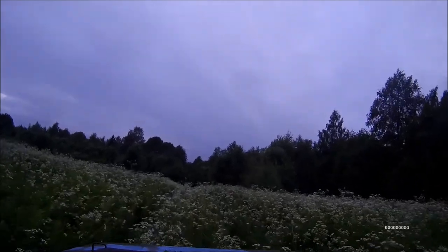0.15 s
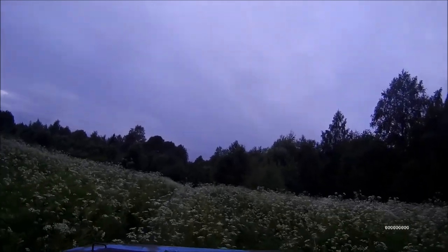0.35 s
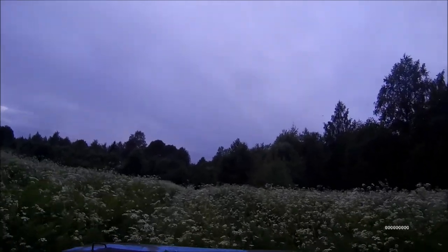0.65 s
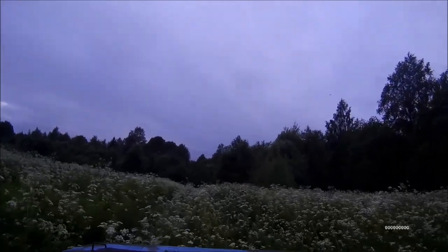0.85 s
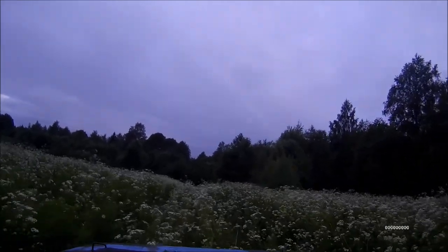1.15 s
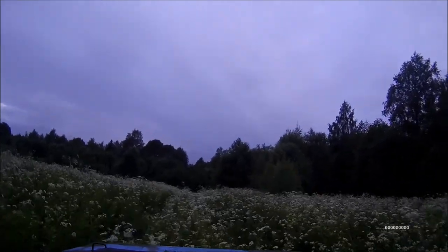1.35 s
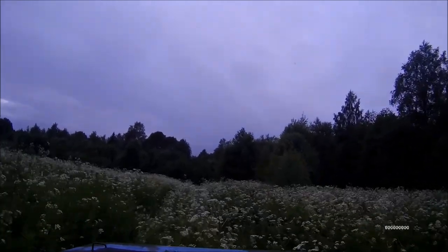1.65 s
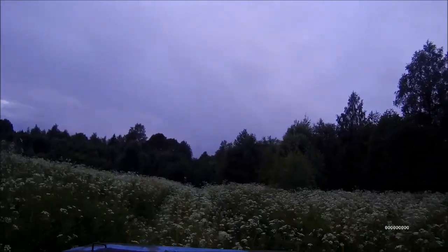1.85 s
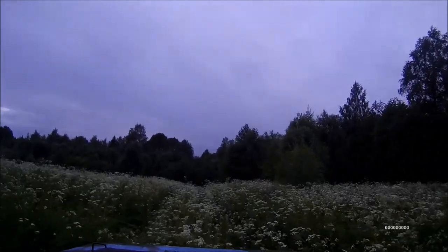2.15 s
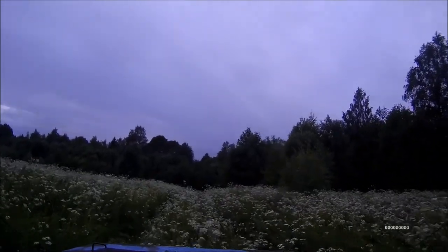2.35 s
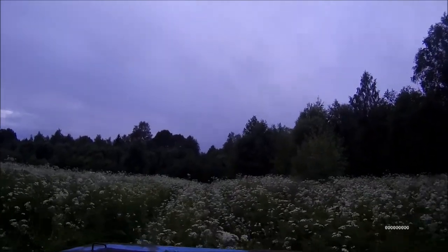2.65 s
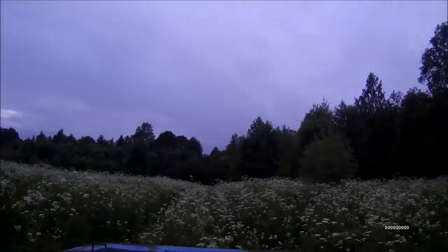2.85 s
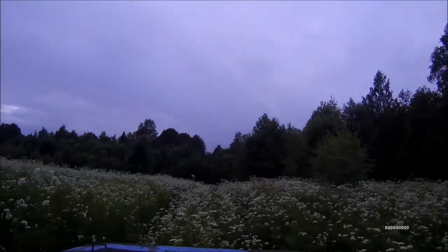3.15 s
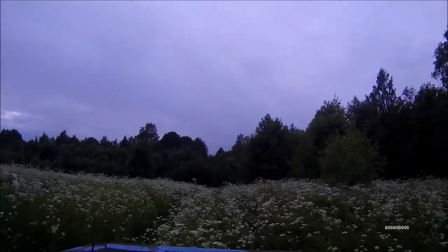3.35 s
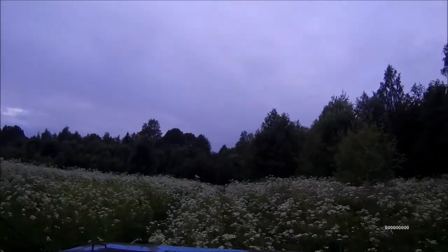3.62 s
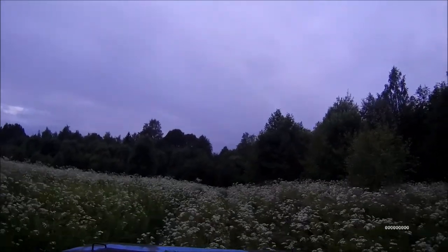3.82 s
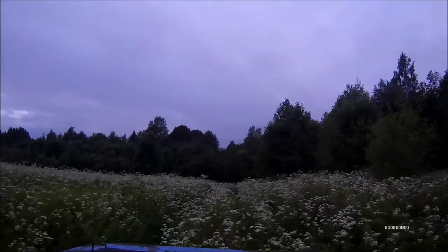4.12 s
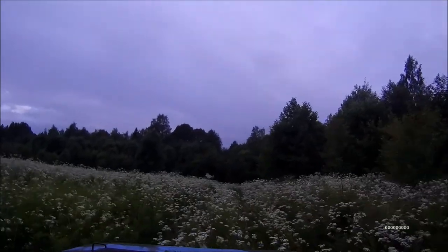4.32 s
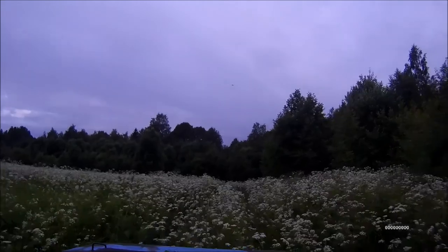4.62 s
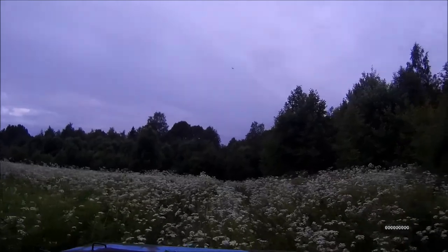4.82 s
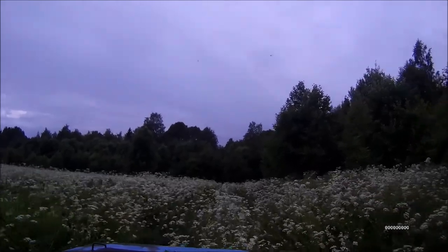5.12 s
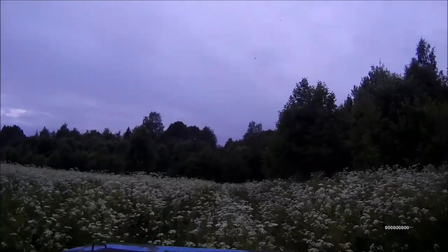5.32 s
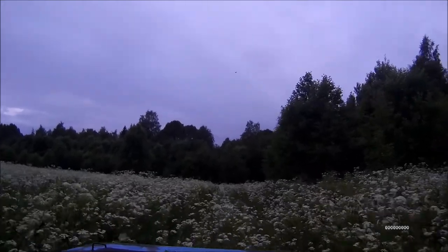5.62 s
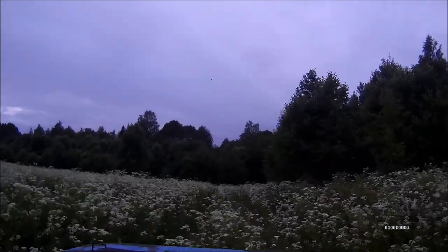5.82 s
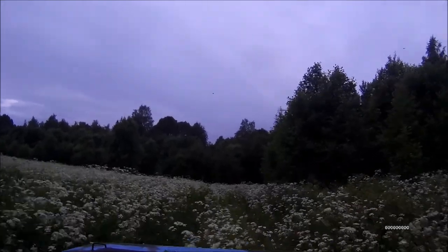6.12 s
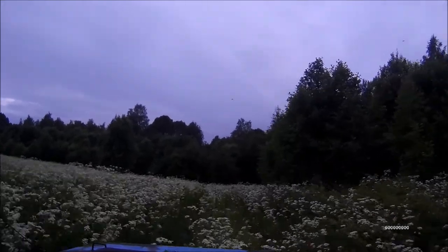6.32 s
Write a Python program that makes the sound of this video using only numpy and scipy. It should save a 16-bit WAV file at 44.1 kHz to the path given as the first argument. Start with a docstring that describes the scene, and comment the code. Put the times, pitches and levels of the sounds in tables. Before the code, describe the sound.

Heard from on board a vehicle crawling through a tall weedy meadow: a deep, booming engine with metallic clatter and a honking intake. Its pitch wavers for three seconds, then climbs and grows fuller. Soft dull thumps come from ruts, low rumble lies beneath, weeds hiss faintly on the panels, and a few stalks snap. Small bright crackles become more frequent toward the end.

```python
"""Off-road vehicle in tall weeds

Heard from on board, an engine booms and clatters while its speed sways and then climbs.
Orders of the firing rate, pulse trains and noise, many ringing resonances, make the engine.
Short pushes into body modes make the thumps of ruts; noise with grains makes weeds brush past.
Struck, splintering stalks snap on the panels; random filtered impulses make bright crackles."""
import sys
import numpy as np
from scipy import signal
from scipy.fft import rfft, irfft, next_fast_len
from scipy.io import wavfile
from scipy.ndimage import uniform_filter1d

SR = 44100
rng = np.random.default_rng(int(sys.argv[2]) if len(sys.argv) > 2 else 0)


def waveform_to_disk(signal):
    """Save audio, clipped to [-1, 1], as 16-bit WAV at the path in sys.argv[1]."""
    frames = np.transpose(np.atleast_2d(signal))
    scaled = np.clip(frames, -1, 1) * 32767
    samples = np.round(scaled).astype(np.int16)
    wavfile.write(sys.argv[1], SR, samples)


N = 285327


def from_db(db):
    """Level definition: amplitude ratio from decibels."""
    return 10 ** (np.asarray(db) / 20)


def rms_one(x):
    """Normalisation to unit effective value."""
    return x / np.sqrt(np.mean(x ** 2) + 1e-20)


def in_time(rows):
    """Linear interpolation: each column of a curve, at every sample."""
    s, *columns = np.transpose(rows)
    return [np.interp(np.arange(N) / SR, s, c) for c in columns]


def drift(rate_hz):
    """Low-passed noise: a slow random course with an rms of 1."""
    step = 40  # samples between computed points
    r = np.exp(-2 * np.pi * rate_hz * step / SR)
    noise = rng.standard_normal(N // step + 2002)
    slow = signal.lfilter([1], [1, -2 * r, r * r], noise)[2000:]  # without the filter's start
    return np.interp(np.arange(N) / step, np.arange(len(slow)), rms_one(slow))


def coloured(x, spectrum):
    """Spectral shaping: a smooth spectrum, 12 dB per octave down above its last point; rms 1."""
    hz, db = np.transpose(spectrum)
    size = next_fast_len(N)
    bins = np.maximum(np.arange(size // 2 + 1) * SR / size, 1)
    gain = from_db(np.interp(np.log(bins), np.log(hz), db))
    gain = gain / np.maximum(bins / hz[-1], 1) ** 2
    return rms_one(irfft(rfft(x, size) * gain, size)[:N])


def resonate(x, hz, width_hz):
    """Damped resonator: a two-pole filter with gain 1 at its top."""
    r = np.exp(-np.pi * width_hz / SR)
    zeros = np.array([1, 0, -1]) * (1 - r * r) / 2
    poles = [1, -2 * r * np.cos(2 * np.pi * hz / SR), r * r]
    return signal.lfilter(zeros, poles, x + 1e-18)


def through(x, modes):
    """Modal superposition: resonances side by side, with alternating signs."""
    return sum((-1) ** k * from_db(db) * resonate(x, hz, width)
               for k, (hz, width, db) in enumerate(modes))


def add(out, s, sound):
    """Superposition: lays a sound into out at time s."""
    at = max(int(s * SR), 0)
    out[at:at + len(sound)] += sound[:max(N - at, 0)]


# engine speed as firing rate: t/s, f/Hz
FIRING_RATE = [(0.0, 48.4), (0.2, 50.5), (0.32, 44.7), (0.45, 51.2), (0.6, 49.1), (0.75, 52.4),
               (0.88, 46.6), (1.02, 50.4), (1.15, 46.3), (1.4, 50.9), (1.55, 47.3), (1.71, 49.3),
               (1.86, 47.3), (2.01, 50.7), (2.16, 47.2), (2.33, 52.4), (2.46, 48.3), (2.56, 50.2),
               (2.68, 48.2), (2.88, 53.7), (3.08, 48.9), (3.56, 54.1), (3.76, 52.0), (3.86, 53.9),
               (4.03, 52.4), (4.26, 57.0), (4.55, 54.9), (4.71, 57.4), (5.07, 58.4), (5.22, 56.9),
               (5.52, 59.4), (5.67, 57.1), (5.82, 58.3), (6.04, 56.5), (6.47, 58.4)]
SLACK_SMOOTH_S = 0.21


def crankshaft():
    """Phase is the integral of frequency: firing rate, firings so far and slowing in Hz per s."""
    rate, = in_time(FIRING_RATE)
    firings = np.cumsum(rate) / SR
    slowing = -uniform_filter1d(np.gradient(rate) * SR, int(SLACK_SMOOTH_S * SR))
    return rate, firings, slowing


# the boom is full at the body resonance, eases off to either side and collapses when the engine lugs
BOOM_HZ, BOOM_HALF_WIDTH_HZ = 57, 5
BOOM_DB, BOOM_DB_PER_HZ = -7.5, 0.55
LUG_HZ, LUG_DB_PER_HZ = 49.5, 4.5
# the second harmonic follows no speed law; the fourth fades once the engine runs fast
DRONE_DB, HUM_DB = -15.5, -24
HUM_FADE_HZ, HUM_FADE_DB_PER_HZ = 53.1, 0.7


def exhaust(rate, firings, boom_flutter_db=1.0, drone_flutter_db=2.0, drone_sway_db=0.8,
            hum_flutter_db=0.56):
    """Harmonics of the firing rate: the lowest lags more as it climbs through the body resonance."""
    turn = 2 * np.pi * firings
    lag = np.arctan((rate - BOOM_HZ) / BOOM_HALF_WIDTH_HZ)
    boom_db = BOOM_DB - BOOM_DB_PER_HZ * np.abs(rate - BOOM_HZ)
    boom_db -= LUG_DB_PER_HZ * np.maximum(LUG_HZ - rate, 0)
    drone_db = DRONE_DB + drone_flutter_db * drift(25) + drone_sway_db * drift(4)
    hum_db = HUM_DB - HUM_FADE_DB_PER_HZ * np.maximum(rate - HUM_FADE_HZ, 0)
    out = from_db(boom_db + boom_flutter_db * drift(5.2)) * np.cos(turn - lag)
    out += from_db(drone_db) * np.cos(2 * turn)
    out += from_db(hum_db + hum_flutter_db * drift(4.5)) * np.cos(4 * turn)
    return np.sqrt(2) * out  # levels are rms


# the mechanics rattle more while the engine slows and the gears go slack
MECHANICAL_DB, SLACK_DB_PER_HZ_PER_S = -36.5, 0.0974


def mechanical_level(slowing):
    """Backlash: the common base level of knock, clatter and valve train, in dB."""
    return MECHANICAL_DB + SLACK_DB_PER_HZ_PER_S * slowing


# blows in one engine cycle of two firings: share of the cycle, relative level/dB
CYCLE_BLOWS = [(0, -10), (0.211, -24), (0.503, -14.5), (0.632, -3), (.84, -3)]
# resonances of block and panels, also rung by clatter and valve train:
# f/Hz, bandwidth/Hz, relative level/dB
BLOCK_MODES = [(295.6, 22.6, 8.5), (442, 39, -8), (478, 24, 2.5), (614.6, 42.5, 4), (1284, 14, -0.5),
               (1397, 69, -7), (1520, 42, -3), (1700, 81, -10), (2180, 230, -14), (2630, 21, -6.5),
               (3030, 90, -14)]


def knock(firings, level_db, uneven_db=3.5, jitter_s=.00005, gain_db=-6.0):
    """Impulse excitation: combustion and valve blows ring the block, never twice quite alike."""
    cycles = np.arange(int(firings[-1] / 2))
    blows = np.zeros(N)
    for share, db in CYCLE_BLOWS:
        at = np.interp(cycles + share, firings / 2, np.arange(N))
        at = at + jitter_s * SR * rng.standard_normal(len(cycles))
        strength = from_db(db + uneven_db * rng.standard_normal(len(cycles)))
        blows[np.clip(at, 0, N - 1).astype(int)] += strength
    return from_db(level_db + gain_db) * rms_one(through(blows, BLOCK_MODES))


# direct rattle spectrum: f/Hz, relative density level/dB
CLATTER_SPECTRUM = [(250, -13), (360, 0), (540, -5), (700, 3.5), (900, -1.5), (1150, -2.5), (1450, -1),
                    (1950, -8), (2400, -8), (3000, -7.5), (3350, -13), (4500, -24), (8000, -39)]


def clatter(firings, level_db, throb_db=0.1, uneven_db=1.62, ring_db=-8):
    """Modulated noise: injectors and drive train rattle, throbbing faintly twice to a firing."""
    puffs = from_db(throb_db * np.cos(2 * np.pi * 2 * firings) + uneven_db * drift(43))
    direct = coloured(puffs * rng.standard_normal(N), CLATTER_SPECTRUM)
    ringing = rms_one(through(puffs * rng.standard_normal(N), BLOCK_MODES))
    return from_db(level_db) * (direct + from_db(ring_db) * ringing)


def valve_train(firings, level_db, gain_db=-0.5, wander=0.013, size=1600):
    """Periodic excitation: cam and chain contacts, alike every cycle, sweep lines over the block."""
    contacts = rng.standard_normal(size)
    crank = firings / 2 + wander / 2 * drift(6.1)
    rasp = np.interp(crank, np.arange(size) / size, contacts, period=1)
    return from_db(level_db + gain_db) * rms_one(through(rasp, BLOCK_MODES))


# intake resonances, each passed twice: f/Hz, bandwidth of one pass/Hz, relative level/dB
INTAKE_MODES = [(619.3, 67, -1), (799, 95, -6)]
# the honk is loudest at one firing rate and falls away to either side; base level before the gain
HONK_DB, HONK_HZ, HONK_BELOW_DB_PER_HZ, HONK_ABOVE_DB_PER_HZ = -33, 52.15, 1.7, 2


def intake(rate, firings, gain_db=-2.0, wander=0.0081, uneven_db=1.2, lope_db=2.0, second_db=-10):
    """Pulsating flow: gulps strong and weak in turn; harmonics honk as they cross the resonances."""
    below, above = HONK_BELOW_DB_PER_HZ * (HONK_HZ - rate), HONK_ABOVE_DB_PER_HZ * (rate - HONK_HZ)
    level_db = HONK_DB - np.maximum(below, above)
    stroke = np.floor(firings + wander * drift(21))
    strength = from_db(uneven_db * drift(61) + lope_db * (-1.0) ** stroke)
    gulps = np.diff(stroke, prepend=stroke[0]) * strength
    # the valve shuts half a firing later with a weaker pulse
    shut = np.floor(firings + .5)
    gulps += from_db(second_db) * np.diff(shut, prepend=shut[0])
    honk = sum(from_db(db) * resonate(resonate(gulps, hz, width), hz, width)
               for hz, width, db in INTAKE_MODES)
    return from_db(level_db + gain_db) * rms_one(honk)


# higher engine orders and the panel each sets singing:
# multiple of the firing rate, level at resonance/dB, panel f/Hz
WHINE_ORDERS = [(6.01, -35, 297), (8.015, -45, 439), (12.05, -55, 660), (21.55, -48, 1276),
                (27.84, -48.5, 1520)]


def whines(firings, flutter_db=3.5, wander=0.19, width_share=0.092):
    """Forced vibration: wavering lines swell as engine speed carries them over a panel resonance."""
    out = np.zeros(N)
    for order, db, hz in WHINE_ORDERS:
        line = np.sin(2 * np.pi * (order * firings + wander * drift(5.7)))
        out += from_db(db + flutter_db * drift(4.3)) * resonate(line, hz, width_share * hz)
    return np.sqrt(2) * out


# ring of the gear case, passed twice
GEAR_HZ, GEAR_WIDTH_HZ = 2655, 180


def gear_whirr(rate, slowing, level_db=-52, slowing_db=-0.06, speed_db=-0.3, flutter_db=2.0):
    """Noise-driven resonance: gear teeth ring their case, most at low and at rising engine speed."""
    db = level_db + slowing_db * slowing + speed_db * (rate - rate.mean()) + flutter_db * drift(4.5)
    ring = resonate(rng.standard_normal(N), GEAR_HZ, GEAR_WIDTH_HZ)
    ring = resonate(ring, GEAR_HZ, GEAR_WIDTH_HZ)
    return from_db(db) * rms_one(ring)


# rumble spectrum: f/Hz, relative density level/dB
RUMBLE_SPECTRUM = [(8, -0.5), (20, -15), (33, 2.5), (50, 1), (75, -8), (100, -10), (135, -8.5),
                   (190, -15.5), (250, -16.5), (340, -37.5), (600, -49)]
# jolts from the deepest ruts: t/s, peak level before the common jolt gain/dB
RUT_JOLTS = [(0.292, -15.5), (0.623, -13), (1.114, -16.5), (2.294, -17), (2.613, -16), (3, -17.5),
             (4.114, -14.5), (4.362, -17), (4.509, -12), (4.719, -18.5), (4.868, -16.5), (5.131, -13),
             (5.545, -13.5), (6.208, -15.5)]
# body modes: f/Hz, bandwidth/Hz, relative level/dB
BODY_MODES = [(96.5, 28, -11), (130.2, 35.4, 6), (178, 63, -4), (243, 41, -14)]
# lesser bumps come by chance, all alike
BUMPS_PER_S, BUMP_DB = 1.8, -19.5


def chassis(rumble_db=-18, jolt_gain_db=6.5, contact_s=0.0031):
    """Impulse response: ruts and bumps push the body softly; tyres rumble over the soil."""
    out = from_db(rumble_db) * coloured(rng.standard_normal(N), RUMBLE_SPECTRUM)
    t = np.arange(SR // 5) / SR
    push = np.sin(np.pi * np.minimum(t / contact_s, 1)) ** 2
    thump = through(push, BODY_MODES)
    thump = thump / np.abs(thump).max()
    for s, db in RUT_JOLTS:
        add(out, s, from_db(db + jolt_gain_db) * thump)
    bumps = (rng.random(N) < BUMPS_PER_S / SR) * from_db(BUMP_DB)
    return out + signal.fftconvolve(bumps, thump)[:N]


# direct hiss spectrum: f/Hz, relative density level/dB
SWISH_SPECTRUM = [(2000, -18), (3700, 5), (4700, -4.5), (6000, -8), (7300, -1.5), (9000, 1.5), (9800, -8),
                  (11700, -10.5), (14400, -13.5), (15800, -9)]
# thin panels that colour the hiss: f/Hz, bandwidth/Hz, relative level/dB
PANEL_MODES = [(4270, 79, -5.5), (4530, 120, -4), (4880, 110, -2.5), (5380, 76, 3.5), (5925, 140, 2),
               (6540, 220, 4), (7720, 150, -4.5), (8810, 87, 1.5), (9280, 410, -6), (10490, 330, -3.5),
               (13450, 400, -8.5)]
# weeds brush harder with speed; base level of the whole layer
BRUSH_DB, BRUSH_DB_PER_HZ = -52.4, 0.14


def weeds(rate, swell_db=1.0, swish_db=0.5, panel_db=-0.5, grain_db=-10, grains_per_s=200,
          spread_db=8.5):
    """Friction noise and random impacts: leaves hiss, seed heads patter; thin panels ring with both."""
    sizes = from_db(spread_db * np.minimum(rng.exponential(1, N), 4)) * rng.choice([-1, 1], N)
    grains = from_db(grain_db) * rms_one(sizes * (rng.random(N) < grains_per_s / SR))
    direct = from_db(swish_db) * coloured(rng.standard_normal(N) + grains, SWISH_SPECTRUM)
    ringing = rms_one(through(rng.standard_normal(N) + grains, PANEL_MODES))
    brush_db = BRUSH_DB + BRUSH_DB_PER_HZ * (rate - rate.mean()) + swell_db * drift(5.5)
    return from_db(brush_db) * (direct + from_db(panel_db) * ringing)


# stout stalks snap on the panels: t/s, peak level/dB, ring f/Hz, gain of the crack beside the ring/dB
STALK_SNAPS = [(1.921, -17, 2800, 0), (2.049, -26, 2680, -9), (2.4075, -17, 2220, -17),
               (2.7238, -24, 2900, -14), (3.4572, -23, 2470, -21.5), (4.3606, -25, 2930, -9),
               (6.1041, -21, 2596, -2)]


def snaps(decay_s=0.0041, strike_db=16, width_hz=560):
    """Impact and fracture: a stiff stalk strikes and splinters; the panel rings for a few cycles."""
    out, t = np.zeros(N), np.arange(SR // 20) / SR
    woody = signal.butter(2, [600, 3400], "band", fs=SR, output="sos")
    for s, db, hz, crack_db in STALK_SNAPS:
        splinters = rng.standard_normal(len(t)) * np.exp(-t / decay_s)
        strike = from_db(strike_db) * (t == 0)
        ring = resonate(resonate(strike + splinters, hz, width_hz), hz, width_hz)
        snap = ring + from_db(crack_db) * signal.sosfilt(woody, splinters)
        add(out, s, from_db(db) * snap / np.abs(snap).max())
    return out


def crackles(rate, crackles_per_s=4, crackle_db=-35, speed_power=16):
    """Random impulses: sparse bright overload crackles, far more frequent as the engine speeds up."""
    born = rng.random(N) < crackles_per_s * (rate / rate.mean()) ** speed_power / SR
    sizes = from_db(crackle_db) * rng.uniform(.5, 1.7, N)  # before the filter
    bright = signal.butter(1, [3000, 12000], "band", fs=SR, output="sos")
    return signal.sosfilt(bright, born * sizes + 1e-18)


def scene():
    """Superposition: one crankshaft drives all engine sounds; ground, weeds and crackles join them."""
    rate, firings, slowing = crankshaft()
    mechanical_db = mechanical_level(slowing)
    engine = exhaust(rate, firings) + knock(firings, mechanical_db) + clatter(firings, mechanical_db)
    engine += valve_train(firings, mechanical_db) + intake(rate, firings)
    engine += whines(firings) + gear_whirr(rate, slowing)
    return (engine + chassis() + weeds(rate) + snaps() + crackles(rate))[None]


CUTOFF_HZ = 15800


def record(dry):
    """Limiting and low-pass: the sound eases in, peaks clip at full scale, and the top is cut."""
    eased = dry * np.minimum(np.arange(N) / (.004 * SR), 1)
    low_pass = signal.ellip(10, .1, 80, CUTOFF_HZ, fs=SR, output="sos")
    return signal.sosfilt(low_pass, np.clip(eased, -1, 1))


dry = scene()
out = record(dry)
waveform_to_disk(out)
```